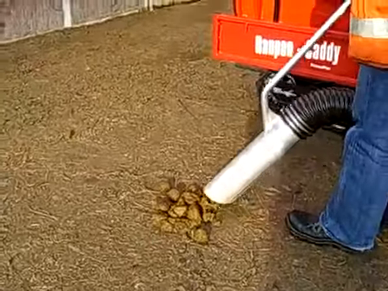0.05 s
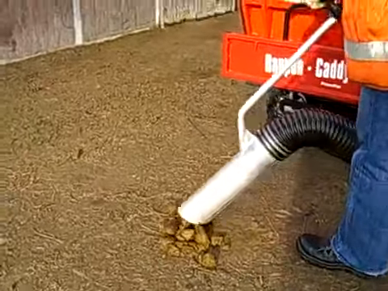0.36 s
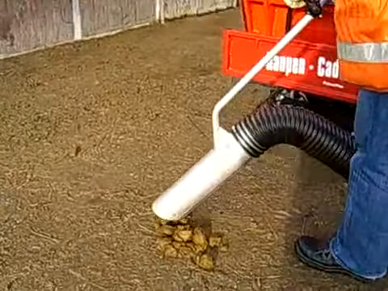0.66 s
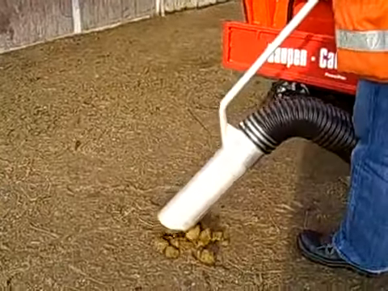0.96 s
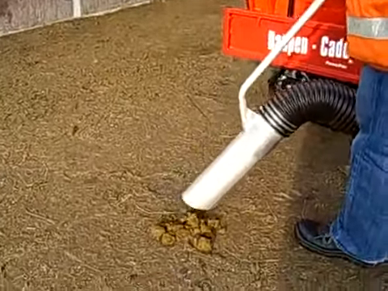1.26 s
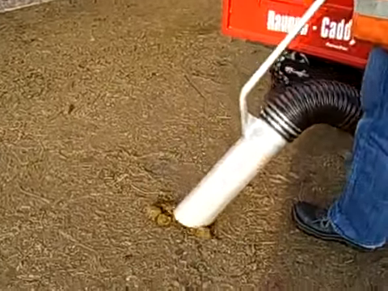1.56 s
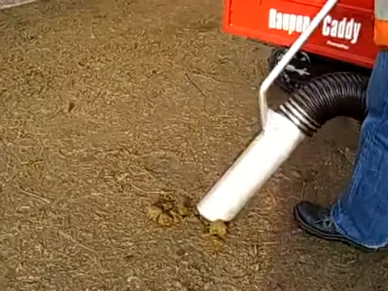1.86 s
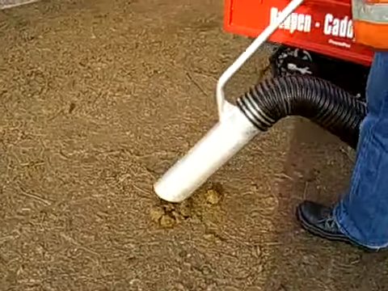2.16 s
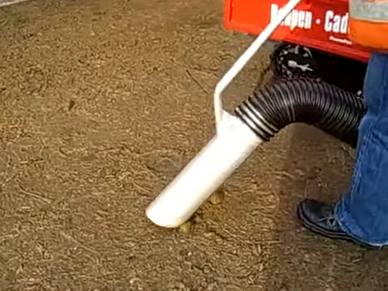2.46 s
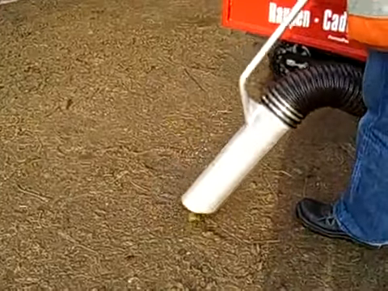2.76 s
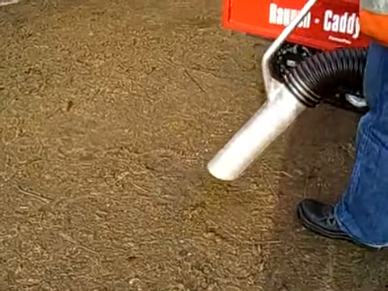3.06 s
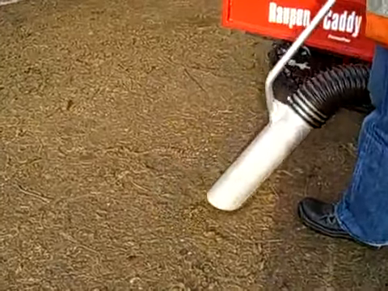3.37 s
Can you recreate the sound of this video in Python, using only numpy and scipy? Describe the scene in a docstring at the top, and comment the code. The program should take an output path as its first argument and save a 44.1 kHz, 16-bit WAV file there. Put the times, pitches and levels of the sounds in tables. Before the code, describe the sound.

A petrol vacuum runs loudly outdoors, close to the microphone, its engine droning and slowly sagging over roaring, hissing air. Wind bumps the microphone at first; the hose whistles softly while grit crackles and lumps rush up the pipe.

```python
"""A petrol vacuum sucks dung off open ground, close to the microphone. Its two-stroke engine drones at
full throttle and slowly sags, the fan whines, air roars and whistles in the ribbed hose and hisses at
the nozzle, grit crackles and lumps rush up the pipe. A slower engine, probably the tracked carrier's,
idles underneath; wind brushes the microphone at first. The sound drops out for an instant, then stops."""
import sys
import numpy as np
from scipy import signal
from scipy.fft import rfft, irfft
from scipy.io import wavfile
from scipy.ndimage import uniform_filter1d, minimum_filter1d

SR = 44100
rng = np.random.default_rng(int(sys.argv[2]) if len(sys.argv) > 2 else 0)


def wav_out(sig):
    """Save sig, one row per channel (or a flat mono array), as 16-bit PCM at SR to the path in sys.argv[1]."""
    wavfile.write(sys.argv[1], SR, np.round(np.clip(np.atleast_2d(sig).T, -1, 1) * 32767).astype(np.int16))


N = 176400

# spectrum of grit striking the pipe: f/Hz, relative level/dB
GRIT_SPECTRUM = [(1500, -17), (3500, -14), (7000, 0.5), (9700, 7), (12000, -0.5), (15500, -17)]


def undb(db):
    """Decibels to gain."""
    return 10 ** (np.asarray(db) / 20)


def unit(x):
    """Scale to rms 1."""
    return x / np.sqrt(np.mean(x ** 2))


def seconds():
    """Time of every sample."""
    return np.arange(N) / SR


def curve(rows):
    """Join (t/s, value) rows by straight lines."""
    return np.interp(seconds(), *np.array(rows).T)


def drift(rate_hz):
    """Smooth random drift at rms 1."""
    hold = int(SR / rate_hz)
    steps = rng.standard_normal(2048)[np.arange(N) // hold]
    return unit(uniform_filter1d(uniform_filter1d(steps, hold), hold))


def colour(x, spectrum):
    """Filter a sound by (f/Hz, level/dB) points and scale it to rms 1."""
    hz, db = np.array(spectrum).T
    bins_hz = np.maximum(np.fft.rfftfreq(N, 1 / SR), 1)
    gain = undb(np.interp(np.log(bins_hz), np.log(hz), db))
    return unit(irfft(rfft(x) * gain, N))


def resonate(x, hz, width_hz, stages=1):
    """Equal resonances in series, each width_hz wide with gain 1 at its centre."""
    for _ in range(stages):
        x = signal.lfilter(*signal.iirpeak(hz, hz / width_hz, fs=SR), x)
    return x


def swells(rows):
    """Bell-shaped swells from (t/s, half-width/s, level/dB) rows."""
    return sum(undb(db) * np.exp(-((seconds() - at) / width) ** 2) for at, width, db in rows)


def impacts(per_s):
    """Clicks of random size at random times."""
    return (rng.random(N) < per_s / SR) * rng.standard_normal(N)


def harmonic(turns, order, db, waver_db):
    """One multiple of the shaft speed, its level wavering slowly and fluttering fast."""
    waver = waver_db * (drift(3.91) + 1.15 * drift(45))
    return np.sqrt(2) * undb(db + waver) * np.sin(2 * np.pi * (order * turns + rng.random()))


def two_stroke(turns):
    """The engine fires once a turn; its third harmonic booms far above the others."""
    # levels of harmonics 3, 2 and 7: t/s, level/dB
    drone_level = [(0, -17.5), (.45, -18), (.9, -16), (1.15, -17), (1.4, -15), (2.0, -16), (2.25, -16.5),
                   (2.7, -16), (3.1, -17.5), (3.28, -19.5), (3.55, -19.5)]
    second_level = [(0, -27), (.7, -25.5), (1.3, -27.5), (1.9, -28.5), (2.25, -33.5), (2.65, -33),
                    (3.1, -28), (3.55, -29)]
    seventh_level = [(0, -33), (.95, -29.5), (1.3, -44), (1.65, -29.5), (1.93, -41), (2.12, -30),
                     (2.5, -39.5), (2.8, -28), (3.05, -38), (3.3, -30.5), (3.55, -34)]
    growl_level = [(0, -46), (.5, -47), (.85, -42.5), (1.25, -44), (1.55, -41), (2.3, -38), (2.7, -37.5),
                   (3.1, -35.5), (3.55, -37)]  # harmonics 4 to 6 swell into a growl: t/s, level/dB
    growl_orders = [(4, 6.5), (5, 7), (6, 5)]  # their balance: shaft multiple, added level/dB
    other_orders = [(1, -33.5), (8, -34), (9, -49), (10, -50), (11, -47.5)]  # remaining harmonics: shaft multiple, level/dB
    tone = harmonic(turns, 3, curve(drone_level), waver_db=.55)
    tone += harmonic(turns, 2, curve(second_level), waver_db=.55)
    tone += harmonic(turns, 7, curve(seventh_level), waver_db=1)
    tone += sum(harmonic(turns, k, curve(growl_level) + db, waver_db=1) for k, db in growl_orders)
    return tone + sum(harmonic(turns, k, db, waver_db=1) for k, db in other_orders)


def exhaust(turns):
    """Each firing blows an uneven puff of gas that rings the silencer."""
    silencer_modes = [(355, 70, -11.5), (469.6, 61, 0.5), (555, 63, 1), (647, 72, -11.5), (760, 45, 0.5),
                      (813.7, 49, 3.5), (867, 53, -0.5)]  # resonances: f/Hz, stage width/Hz, relative level/dB
    rasp_level = [(0, -31), (1.3, -30), (2.2, -30), (3.1, -29), (3.55, -30)]  # exhaust rasp: t/s, level/dB
    puffs = rng.standard_normal(N) * np.exp(-(turns % 1) / .47)
    rasp = sum(undb(db) * resonate(puffs, hz, width, stages=2) for hz, width, db in silencer_modes)
    return undb(curve(rasp_level)) * unit(rasp)


def fan(turns):
    """A faint whine of high shaft multiples over a roar of air, which pulses with the shaft."""
    roar_spectrum = [(40, -4.5), (100, 0.5), (250, 1), (400, 6.5), (850, -0.5), (1000, -1.5), (1350, -2),
                     (1600, -7.5), (2250, -5), (3100, -10), (4200, -13), (6500, -18.5), (10000, -16),
                     (16000, -42)]  # air in fan and hose: f/Hz, relative level/dB
    roar_level = [(0, -26.5), (1.2, -27.5), (1.9, -27), (2.2, -28), (3.1, -27), (3.3, -30), (3.55, -28.5)]  # its roar: t/s, level/dB
    whine_db, db_per_octave = -48.5, -7.5
    whine = sum(harmonic(turns, k, whine_db + db_per_octave * np.log2(k / 12), waver_db=2.2)
                for k in range(12, 37))
    air = rng.standard_normal(N) * (1 + .1 * np.cos(2 * np.pi * turns))
    flicker_db = .79 * drift(25.1)
    return whine + colour(air, roar_spectrum) * undb(curve(roar_level) + flicker_db)


def nozzle():
    """Air hisses into the pipe, flickering in level."""
    hiss_spectrum = [(3000, -12), (5500, -7.5), (7500, -10.5), (8800, -5), (10200, -5.5), (11300, -11.5),
                     (12500, -20.5), (15500, -21)]  # air at the nozzle: f/Hz, relative level/dB
    hiss_level = [(0, -39), (.42, -49.5), (.6, -42), (1.45, -40), (1.8, -41), (2.14, -41.5), (2.3, -38.5),
                  (2.9, -40), (3.55, -40.5)]  # its hiss: t/s, level/dB
    hiss = colour(rng.standard_normal(N), hiss_spectrum)
    return hiss * undb(curve(hiss_level) + 1.4 * drift(46))


def grit():
    """Loose grit crackles lightly in the pipe all the time."""
    hits = impacts(per_s=58)
    tick = rng.standard_normal(N) * np.exp(-seconds() / .002)
    return undb(-49.5) * colour(signal.fftconvolve(hits, tick)[:N], GRIT_SPECTRUM)


def wind():
    """A few low buffets on the microphone."""
    rumble_spectrum = [(10, -29), (30, -9), (45, -4.5), (110, -2), (180, -9), (400, -12.5), (1500, -73.5)]  # wind rumble: f/Hz, relative level/dB
    gusts = [(.07, 0.17, -26), (.22, .03, -31.5), (.38, 0.035, -22), (.58, 0.052, -39)]  # buffets: t/s, half-width/s, level/dB
    return colour(rng.standard_normal(N), rumble_spectrum) * swells(gusts)


def idling_engine():
    """Slow, uneven firings ring a second silencer in soft thumps."""
    firing_rate = [(0, 15.45), (2.1, 15.45), (2.2, 15.1), (3.6, 15.1)]  # idle speed: t/s, firing rate/Hz
    silencer_modes = [(70.4, .11, -6.5), (126.8, 0.11, -2), (141.3, 0.086, -0.5), (192.4, 0.27, -9)]  # ring of one firing: f/Hz, t60/s, relative level/dB
    idle_level = [(0, -37), (.9, -34), (1.3, -33), (1.95, -31), (2.2, -36.5), (2.8, -35), (3.2, -30),
                  (3.55, -33.5)]  # thumps: t/s, level/dB
    first_firing_s, scatter_db = .058, 2.1
    t = seconds()
    turns = np.cumsum(curve(firing_rate)) / SR - first_firing_s * firing_rate[0][1]
    fires_at = np.flatnonzero(np.diff(np.floor(turns)) > 0)
    firings = np.zeros(N)
    firings[fires_at] = undb(scatter_db * rng.standard_normal(N))[:len(fires_at)]
    ring = sum((-1) ** k * undb(db - 60 * t / t60) * np.sin(2 * np.pi * hz * t)
               for k, (hz, t60, db) in enumerate(silencer_modes))
    thumps = resonate(signal.fftconvolve(firings, ring)[:N], hz=140, width_hz=170)
    return undb(curve(idle_level)) * unit(thumps)


def hose_whistles():
    """Air in the ribbed hose whistles softly on one wavering note after another."""
    notes = [(0.103, .15, 2200, -41), (0.302, 0.11, 1757, -39.5), (.35, .35, 1268, -41.5),
             (0.56, 0.23, 2185, -39.5), (.7, .1, 1755, -41), (1.25, .14, 2168, -37.5), (1.3, .2, 4325, -46),
             (1.52, 0.2, 3010, -42.5), (1.529, .07, 1258, -34), (1.924, 0.18, 1272, -40),
             (2.02, 0.18, 2998, -41.5), (2.428, .14, 2985, -39), (2.766, 0.19, 1370, -40)]  # whistles: t/s, half-width/s, f/Hz, level/dB
    drift_hz = 9.5
    whistles = np.zeros(N)
    for at, width, hz, db in notes:
        tone = np.sin(2 * np.pi * np.cumsum(hz + drift_hz * drift(60)) / SR)
        flicker = undb(-drift(30))
        whistles += unit(tone * flicker) * swells([(at, width, db)])
    return whistles


def lumps():
    """Each lump rushes up the pipe in a spray of tiny impacts."""
    rushes = [(.3, .03, -39), (1.87, .03, -43), (2.3, .04, -40), (2.47, .06, -54), (2.62, .08, -41),
              (3.24, .03, -38.5)]  # passing lumps: t/s, half-width/s, level/dB
    grains = impacts(per_s=2800) * undb(rng.random(N))
    return colour(grains, GRIT_SPECTRUM) * swells(rushes)


def slurp():
    """The hose slurps as the last lump goes in."""
    gulp = resonate(rng.standard_normal(N), hz=3200, width_hz=1100, stages=2)
    return unit(gulp) * swells([(3.225, .022, -36)])


def scene():
    """Engine and fan share one shaft; everything reaches the microphone dry, in the open."""
    shaft_speed = [(0, 110.1), (.45, 109.3), (.9, 107.8), (1.22, 108.15), (1.5, 107), (1.78, 107),
                   (2.0, 106.85), (2.22, 105), (2.4, 106.4), (2.67, 106), (3.03, 104.7), (3.23, 104.3),
                   (3.38, 103.4), (3.58, 104)]  # sagging engine speed: t/s, firing rate/Hz
    jitter_turns = .002 * drift(60)
    turns = np.cumsum(curve(shaft_speed)) / SR + jitter_turns
    machine = two_stroke(turns) + exhaust(turns) + fan(turns)
    suction = slurp() + hose_whistles() + nozzle() + lumps() + grit()
    return (machine + suction + idling_engine() + wind())[None]


def limiter(x, ceiling, window_s):
    """Turn the level down briefly around peaks above the ceiling."""
    size = int(window_s * SR)
    gain = ceiling / np.maximum(np.abs(x), ceiling)
    return x * uniform_filter1d(minimum_filter1d(gain, size), size)


def record(dry):
    """The recorder limits peaks, notches the treble, drops out briefly, stops, and cuts the top."""
    notch_hz, stage_width_hz, top_hz = 7870, 270, 15750
    dropout_s, resume_s, end_s = 3.531, 3.553, 3.578
    t = seconds()
    sound = limiter(dry, ceiling=.47, window_s=.004)
    notch = signal.iirnotch(notch_hz, notch_hz / stage_width_hz, fs=SR)
    sound = signal.lfilter(*notch, signal.lfilter(*notch, sound))
    running = (t < dropout_s) | ((t > resume_s) & (t < end_s))
    sound *= uniform_filter1d(running.astype(float), size=110)  # 2.5 ms fades
    return signal.sosfilt(signal.ellip(10, .2, 80, top_hz, fs=SR, output="sos"), sound)


dry = scene()
out = record(dry)
wav_out(out)
```